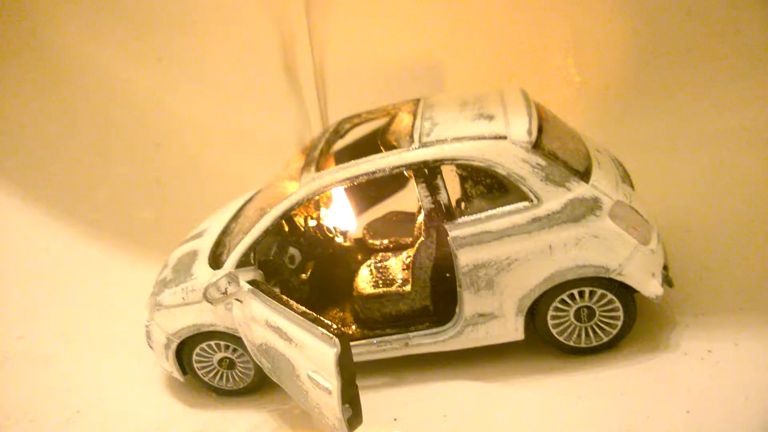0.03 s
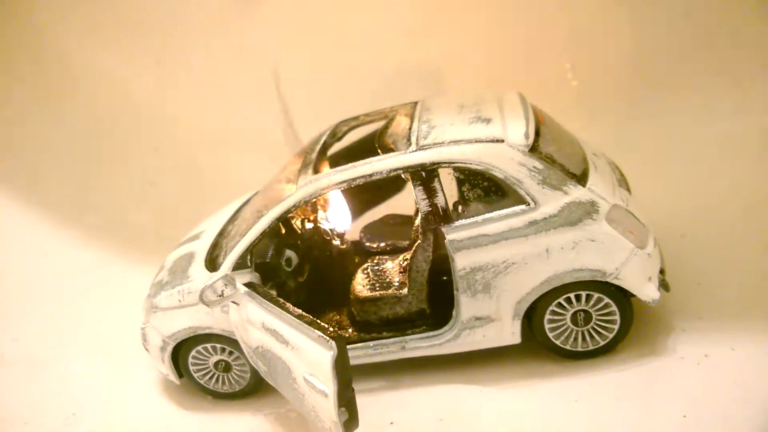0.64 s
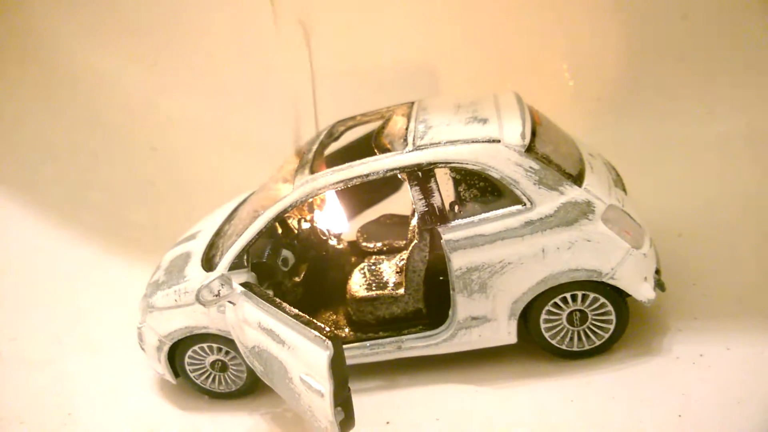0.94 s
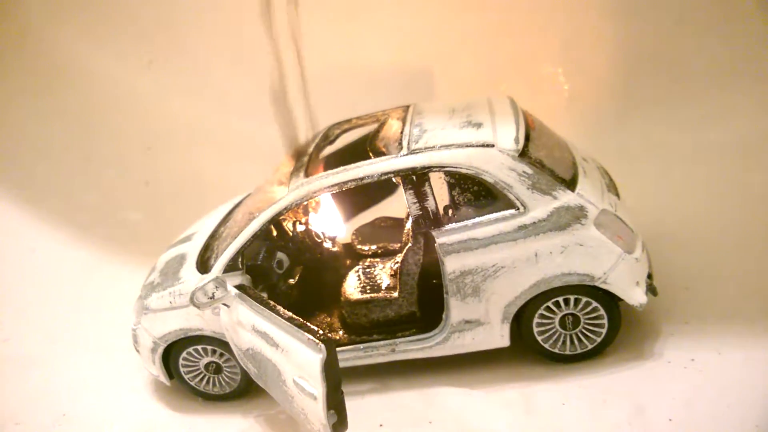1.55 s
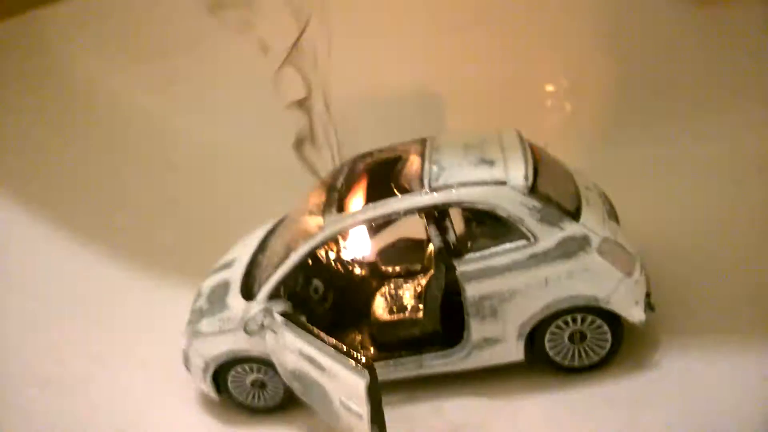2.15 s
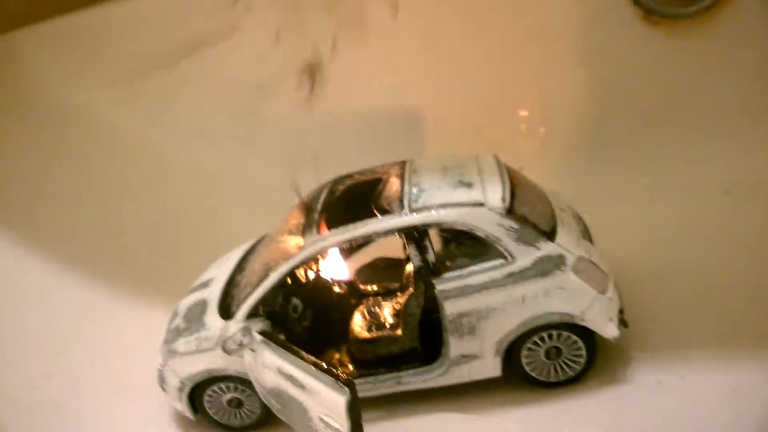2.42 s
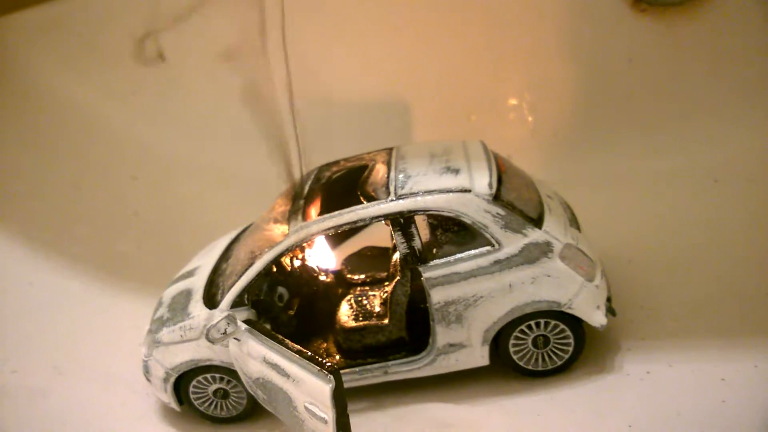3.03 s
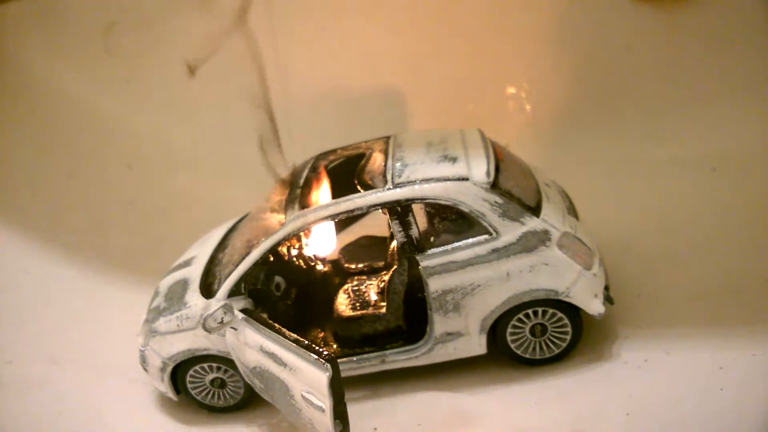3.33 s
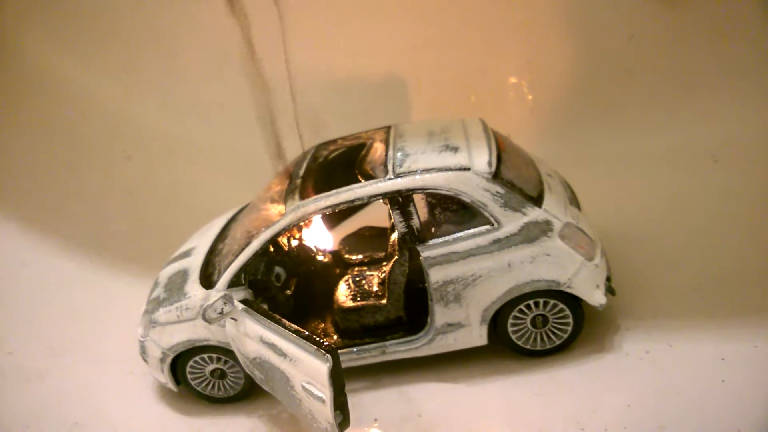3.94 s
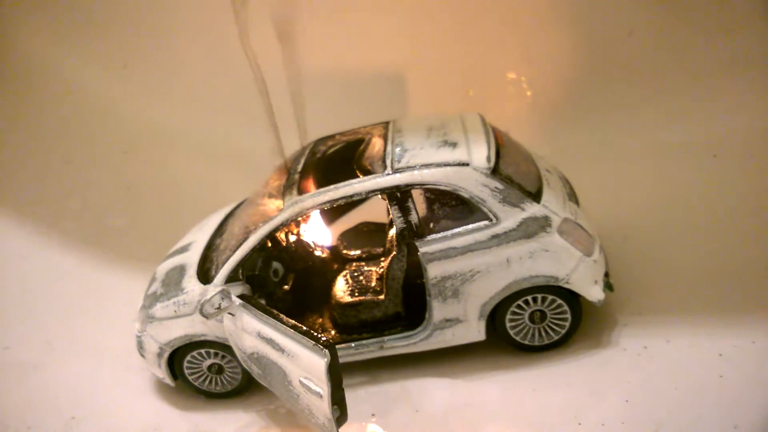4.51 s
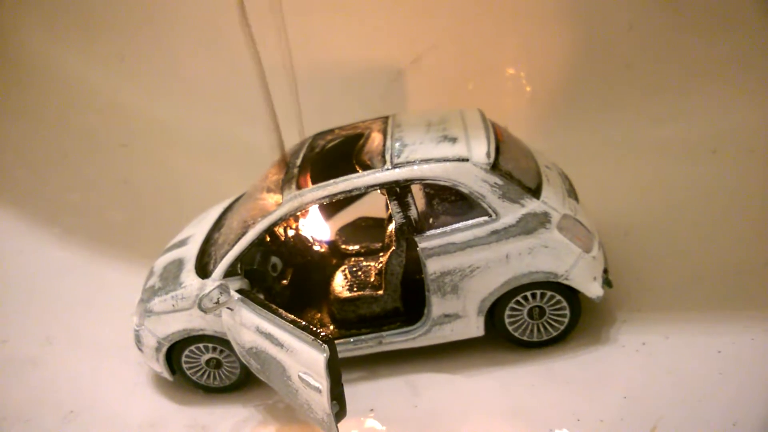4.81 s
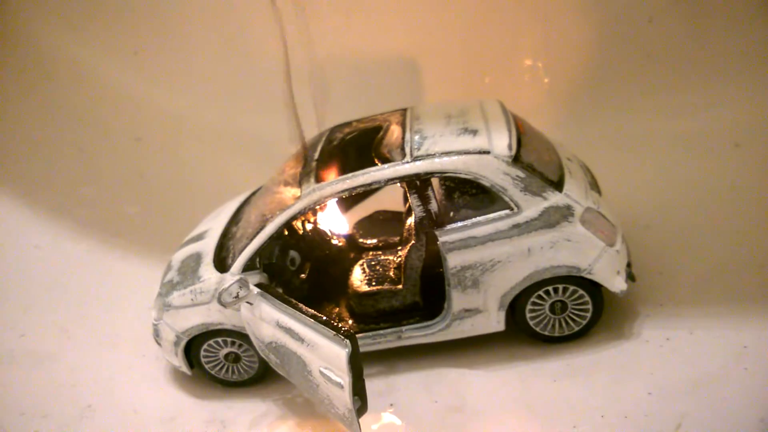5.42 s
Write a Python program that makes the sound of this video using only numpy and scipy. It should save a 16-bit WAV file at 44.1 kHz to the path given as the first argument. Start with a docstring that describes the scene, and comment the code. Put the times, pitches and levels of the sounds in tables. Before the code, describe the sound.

A small flame eats at a plastic toy car in a sink, heard close up in a tiled room. For the whole five and a half seconds, faint, dry ticks and crackles come irregularly, about ten a second, over a quiet steady hiss and a thin sizzle that sometimes spits briefly. At about 0.4 seconds the hand-held microphone is bumped, a light touch and then a dull knock that briefly rings the basin. A second bump comes at 2.2 seconds with a soft low rumble of shifting grip. The loudest sound is a sharp pop at 3.4 seconds, followed at once by a third bump. The crackling carries on, with small fizzes around 4 seconds and another strong pop at 5 seconds. A faint hollow hum swells softly underneath, with a few tiny finger taps. Pops and knocks have a very short echo.

```python
"""Burning toy car in a sink

A small flame eats the plastic seats of a toy car that stands in a sink in a tiled room. Blisters
burst and excite the resonances of the car's shell: most tick, a few pop loudly, over a steady hiss.
A hand-held camera is bumped three times, each a touch and then a knock that rings its case and the
basin. Beneath, the air modes of the basin's hollow hum in soft swells."""
import sys
import numpy as np
from scipy import signal
from scipy.fft import rfft, irfft
from scipy.io import wavfile

SR = 44100
rng = np.random.default_rng(int(sys.argv[2]) if len(sys.argv) > 2 else 0)


def inscribe(sig):
    """Save sig as 16-bit PCM at rate SR to the path in sys.argv[1].

    A 1-D sig is mono; a 2-D sig holds one channel per row.
    Samples are clipped to [-1, 1] before scaling.
    """
    pcm = np.round(np.clip(np.atleast_2d(sig).T, -1, 1) * 32767)
    wavfile.write(sys.argv[1], SR, pcm.astype(np.int16))


N = 245637
TIME = np.arange(N) / SR

# air modes of the basin and the room: (frequency [Hz], bandwidth [Hz], gain [dB])
AIR_MODES = [(189.8, 25, -4.5), (252, 7.4, -6.5), (409, 21.5, -5), (473, 27.5, 1.5), (735, 73, -16)]
# spectrum of the hand's rubbing and rumble: (frequency [Hz], relative density [dB])
HANDLING_SPECTRUM = [(15, -4.5), (30, 6.5), (60, -5), (120, -9), (300, -18), (900, -21), (2500, -58.5)]


def blisters(count=64, faint_per_s=4, faint_db=-44.5, faint_treble_db=-11, spread_db=2):
    """A point process: faint ticks fall at random gaps among the prominent bursts."""
    # bursting blisters: (time [s], relative level [dB], treble share [dB])
    prominent = [(0.1067, -38.5, -15), (0.2313, -42.5, -19), (0.336, -30.5, -23), (0.5492, -33, -18),
                 (0.8702, -28, -30), (0.9518, -45.5, -5), (1.1852, -41, -7), (1.2017, -28, -5),
                 (1.4377, -37.5, -23), (1.5683, -31.5, -10), (1.5848, -37.5, -5), (1.7573, -25, -3),
                 (1.9644, -35, -15.5), (2.001, -33.5, -11), (2.279, -36.5, -28), (2.4145, -25, -27),
                 (2.5999, -39.5, -2.5), (2.7995, -40, -12), (2.8503, -25.5, -9.5), (3.052, -32, -23),
                 (3.0704, -25.5, -21), (3.248, -43, -25), (3.3842, -7, -18.5), (3.5918, -30.5, -18),
                 (3.771, -33.5, -12.5), (3.8114, -35.5, -11), (3.8345, -38, -8), (4.0304, -31.5, -21),
                 (4.2045, -39, -16), (4.2628, -34, -6.5), (4.4212, -38, -4), (4.4398, -37, -5.5),
                 (4.65, -29.5, -30), (4.698, -26, -16.5), (5.0002, -12, -13.5), (5.1517, -34.5, -28),
                 (5.3041, -39.5, -10.5), (5.3642, -41.5, -16), (5.408, -32.5, -22), (5.4608, -27, -20),
                 (5.4896, -30, -34)]
    gap, size, colour = rng.uniform(-1, 1, (count, 3)).T
    times = np.cumsum(1 + gap) / faint_per_s
    faint = np.transpose([times, faint_db + spread_db * size, faint_treble_db + spread_db * colour])
    return np.vstack([prominent, faint[times < N / SR]])


def rupture(tear_s, tear_share, fizzle_s, fizzle_share):
    """Impulsive excitation of unit energy: a blister breaks, its skin tears and gas fizzles out."""
    force = tear_share * burst(tear_s) + fizzle_share * burst(fizzle_s)
    force[0] += 1
    return force / np.linalg.norm(force)


def crackles(gain_db, treble_hz, body_hz, lag_s, open_pop_db):
    """Each rupture is a broadband transient that drives the shell and partly escapes to the room."""
    usual_db, usual_treble_db = -24.5, -18
    on_shell, escaping = np.zeros((2, N))
    for s, db, treble_db in blisters():
        slowness = from_db(2.03 * (open_pop_db - db))   # weak blisters tear more slowly
        tick = rupture(tear_s=0.000093 * slowness, tear_share=0.86 * slowness,
                       fizzle_s=0.0031, fizzle_share=0.29 * slowness)
        # the louder the pop, the thinner its body; no two are alike
        body_db = 0.3679 * (usual_db - db) + 2.5 * rng.uniform(-1, 1)
        treble = (from_db(treble_db - usual_treble_db) - 1) * resonate(tick, [(treble_hz, 6000, 0)])
        body = (from_db(body_db) - 1) * resonate(tick, [(body_hz, 3200, 0)])
        tick = from_db(db + gain_db) * (tick + treble + body)
        add(on_shell, s + lag_s, tick)
        # the loudest burst at the open roof, the rest deep in the cabin
        add(escaping, s + lag_s, tick * from_db(1.5 * min(db - open_pop_db, 0)))
    return on_shell, escaping


def sizzle(simmer_db, spit_db, highpass_hz):
    """Shot noise with little body: the melt simmers throughout and now and then spits a dense fizz."""
    # strength of the simmering melt: (time [s], relative level [dB])
    simmer_curve = [(0, -0.5), (0.7, -8.5), (1.1, -4), (2.4, 1), (3.7, -2), (4.2, -3), (5.57, -0.5)]
    # gas spitting out of the melt: (peak time [s], relative level [dB])
    spits = [(0.115, -58), (0.336, -64), (0.424, -54.5), (0.558, -60), (0.875, -58), (1.433, -56.5),
             (1.679, -57.5), (2.0, -58.5), (2.797, -66), (3.784, -55.5), (4.052, -51.5), (4.455, -59.5),
             (4.679, -56)]
    simmer_gain = from_db(np.interp(TIME, *np.transpose(simmer_curve)) + simmer_db)
    simmer = simmer_gain * grains(per_s=520, spread_db=3.0)
    spit_gain = sum(swell(s, db + spit_db, sigma_s=0.015) for s, db in spits)
    fizz = spit_gain * grains(per_s=2500, spread_db=10.5)
    return cut(simmer + fizz, highpass_hz, "high", order=1)


def grains(per_s, spread_db):
    """A Poisson process of unit rms: tiny blisters burst independently, in random sizes."""
    sizes = from_db(spread_db * np.minimum(rng.exponential(1, N), 3)) * rng.choice([-1, 1], N)
    return rms_one(sizes * (rng.random(N) < per_s / SR))


def car_shell(force):
    """Forced vibration: the car's resonances colour every burst."""
    # modes of the shell and cabin: (frequency [Hz], bandwidth [Hz], gain [dB])
    shell_modes = [(740, 425, -7), (1376, 400, -7.5), (2103, 210, 0.5), (2466, 100, -6.5), (3524, 327, 0),
                   (5044, 456, 1), (6030, 810, 2.5), (7310, 850, -4), (7300, 940, -1), (9650, 334, -2.5),
                   (10350, 400, -3), (11750, 120, -8.5), (13240, 360, -6), (16300, 270, -42)]
    return resonate(force, shell_modes)


def contacts():
    """Multiple impact: a bump is a rebounding touch, two soft pushes of the hand, then a knock."""
    # soft nudges of the palm: (time [s], relative level [dB], contact time [ms])
    nudges = [(0.674, -54, 9.2), (0.6889, -43, 2.7), (1.403, -51, 4), (2.114, -44.5, 4.7),
              (2.122, -38.5, 11), (2.465, -44.5, 27), (4.857, -43.5, 33)]
    # bumps of the hand on the camera, in relative levels:
    # (knock time [s], knock [dB], touch [dB], weight [dB], weight's lead [s], share to the basin [dB])
    hand_bumps = [(0.4233, -24, -38, -35.5, 0.0178, -0.5), (2.2168, -31, -36.5, -25, 0.00345, -4.5),
                  (3.4053, -31.5, -37.5, -27.5, 0.0169, -6)]
    touch_lead_s, rebound_s, grip_lead_s = 0.037, 0.006, 0.009
    touch_ms, rebound_ms, weight_ms, grip_ms, knock_ms = 1.0, 2.8, 5.3, 3.77, 1.17
    rows = [(s, db, contact_ms, 0) for s, db, contact_ms in nudges]
    for s, knock_db, touch_db, weight_db, weight_lead_s, passed_db in hand_bumps:
        rows += [(s - touch_lead_s, touch_db, touch_ms, passed_db),
                 (s - touch_lead_s + rebound_s, touch_db, rebound_ms, passed_db),
                 (s - weight_lead_s, weight_db, weight_ms, passed_db),
                 (s - grip_lead_s, weight_db - 4, grip_ms, passed_db),
                 (s, knock_db, knock_ms, passed_db)]
    return rows


def bumps(push_db, case_db, basin_db, rub_db, rub_s):
    """Impact excitation: the shorter the hand's contact, the higher the modes that it reaches."""
    # modes of the camera's case: (frequency [Hz], gain [dB], T60 [s])
    case_modes = [(137, -21, 0.07), (253, -7.5, 0.057), (497, -3.5, 0.11), (710, -1.5, 0.015),
                  (930, -43, 0.0084), (1430, -15, 0.047)]
    # modes of the basin, whose close pairs beat: (frequency [Hz], gain [dB], T60 [s])
    basin_modes = [(179, -22.5, .35), (189, -17.5, .4), (243, -27, .4), (307, -35, .35), (446, -24, .3),
                   (466, -19.5, .37), (690, -39, .4)]
    push, on_case, on_basin, rub = np.zeros((4, N))
    for s, db, contact_ms, passed_db in contacts():
        phase = np.minimum(TIME[:2048] * 1000 / contact_ms, 1)
        pulse = np.sin(np.pi * phase) ** 2
        add(push, s, from_db(db) * pulse)
        add(on_case, s, from_db(db) * pulse / pulse.sum())
        add(on_basin, s, from_db(db + passed_db) * pulse / pulse.sum())
        add(rub, s, from_db(db) * np.exp(-TIME[:SR // 4] / rub_s))
    case = sum(from_db(db + case_db) * ring(on_case, hz, t60) for hz, db, t60 in case_modes)
    basin = sum(from_db(db + basin_db) * ring(on_basin, hz, t60) for hz, db, t60 in basin_modes)
    # the skin drags a little after each touch
    drag = cut(from_db(rub_db) * rub * coloured_noise(HANDLING_SPECTRUM, N), 1500, "low")
    return drag - cut(from_db(push_db) * push + case + basin, 14, "high", order=1)


def taps(rise_cycles):
    """Heavy damping: under a fingertip the case swings for only a cycle or two."""
    # light taps on the camera's case: (time [s], envelope peak [dB], frequency [Hz])
    finger_taps = [(1.312, -56.5, 617), (1.412, -50, 600), (2.334, -51.5, 656), (2.391, -49.5, 606),
                   (3.14, -51.5, 332), (4.362, -50.5, 480), (4.854, -44.5, 626)]
    out, t = np.zeros(N), TIME[:2048]
    for s, db, hz in finger_taps:
        age = t * hz / rise_cycles
        envelope = from_db(db) * age ** 2 * np.exp(2 * (1 - age))
        add(out, s, envelope * np.sin(2 * np.pi * hz * t))
    return out


def basin_walls(x, share, decay_s, nearest_s):
    """Early reflection: the curved glaze adds a spray of echoes within milliseconds."""
    echoes = share * burst(decay_s) * (TIME[:1024] > nearest_s)
    return x + signal.fftconvolve(x, echoes)[:N]


def room(x, wet_db, t60, treble_t60, treble_hz, first_echo_s):
    """Reverberation: tiled walls return a short, dense tail after a gap; its treble dies first."""
    # spectrum of the reverberation: (frequency [Hz], relative density [dB])
    tail_spectrum = [(100, -9), (500, -4), (1500, -6.5), (2900, -11), (3700, 1), (5200, -2), (7500, -5),
                     (10500, -3.5), (12500, -11), (15500, -20)]
    t = TIME[:SR // 2]
    noise = coloured_noise(tail_spectrum, len(t))
    low = cut(noise, treble_hz, "low", order=1)
    tail = low * from_db(-60 * t / t60) + (noise - low) * from_db(-60 * t / treble_t60)
    tail *= t > first_echo_s
    return from_db(wet_db) * signal.fftconvolve(x, tail / np.linalg.norm(tail))[:N]


def boom(x, gain_db, t60):
    """Modal decay: a bump stirs the room's air modes, which beat unevenly as they die."""
    tail = resonate(rng.standard_normal(SR), AIR_MODES) * from_db(-60 * TIME[:SR] / t60)
    return from_db(gain_db) * signal.fftconvolve(x, tail / np.linalg.norm(tail))[:N]


def hiss(level_db):
    """Stationary broadband noise: a steady hiss under the flame."""
    # spectrum of the hiss: (frequency [Hz], relative density [dB])
    hiss_spectrum = [(59, -65), (100, -10.5), (185, -5), (358, -7), (452, 1), (502, -11.5), (818, -16.5),
                     (970, -13.5), (1760, -18.5), (1910, -15.5), (2990, -19.5), (5190, -17.5),
                     (6990, -21.5), (10500, -23), (16000, -26.5)]
    return from_db(level_db) * coloured_noise(hiss_spectrum, N)


def handling_rumble(steady_db, regrip_s, regrip_db):
    """Structure-borne noise: small movements rumble in the camera, more as the hand shifts its grip."""
    envelope = from_db(steady_db) + swell(regrip_s, regrip_db, sigma_s=0.26)
    return envelope * coloured_noise(HANDLING_SPECTRUM, N)


def basin_hum(steady_db, swell_gain_db):
    """Cavity resonance: noise drives the basin's air modes, which hum and swell softly."""
    # swells of the hum: (peak time [s], relative level [dB], Gaussian width [s])
    hum_swells = [(0.168, -75.5, 0.039), (0.55, -61.5, 0.035), (0.681, -58.5, 0.0094), (1.798, -64, 0.033),
                  (1.986, -58.5, 0.079), (2.42, -62.5, 0.071), (3.02, -64.5, 0.057), (3.547, -57, 0.02),
                  (4.476, -63, 0.047), (4.632, -60.5, 0.035), (5.178, -57.5, 0.016), (5.293, -59, 0.044),
                  (5.56, -66, 0.088)]
    swelling = sum(swell(s, db + swell_gain_db, sigma_s) for s, db, sigma_s in hum_swells)
    return (from_db(steady_db) + swelling) * rms_one(resonate(rng.standard_normal(N), AIR_MODES))


def resonate(x, resonances):
    """Modal superposition: parallel band-pass resonators of alternating sign."""
    out = 0
    for k, (hz, width, db) in enumerate(resonances):
        r = np.exp(-np.pi * width / SR)
        poles = [1, -2 * r * np.cos(2 * np.pi * hz / SR), r * r]
        band = (1 - r * r) / 2 * signal.lfilter([1, 0, -1], poles, x + 1e-18)
        out = out + (-1) ** k * from_db(db) * band
    return out


def ring(x, hz, t60):
    """A damped oscillator: a unit impulse starts a decaying sine of amplitude one."""
    r, w = from_db(-60 / (t60 * SR)), 2 * np.pi * hz / SR
    return signal.lfilter([0, np.sin(w)], [1, -2 * r * np.cos(w), r * r], x + 1e-18)


def burst(decay_s, size=1024):
    """Exponential decay: a puff of noise with unit energy."""
    puff = rng.standard_normal(size) * np.exp(-TIME[:size] / decay_s)
    return puff / np.linalg.norm(puff)


def swell(s, db, sigma_s):
    """A Gaussian envelope: gain rises and falls around a time."""
    return from_db(db) * np.exp(-((TIME - s) / sigma_s) ** 2 / 2)


def coloured_noise(spectrum, size):
    """Spectral shaping of white noise, scaled to unit rms."""
    hz, db = np.transpose(spectrum)
    bins = np.maximum(np.fft.rfftfreq(size, 1 / SR), 1)
    gain = from_db(np.interp(np.log(bins), np.log(hz), db))
    return rms_one(irfft(rfft(rng.standard_normal(size)) * gain, size))


def cut(x, hz, kind, order=2):
    """Maximally flat low- or high-pass filtering."""
    return signal.sosfilt(signal.butter(order, min(hz, .45 * SR), kind, fs=SR, output="sos"), x)


def add(track, s, sound):
    """Superposition of a short sound on a track at a given time."""
    at = int(np.clip(round(s * SR), 0, N - 1))
    track[at:at + len(sound)] += sound[:N - at]


def rms_one(x):
    """Normalisation to unit rms."""
    return x / np.sqrt(np.mean(x ** 2) + 1e-20)


def from_db(db):
    """Decibels to amplitude ratio."""
    return 10 ** (np.asarray(db) / 20)


def scene():
    """Source and path: fire and knocks sound with the room's echo, over hiss, rumble and hum."""
    on_shell, escaping = crackles(gain_db=9, treble_hz=11440, body_hz=1480, lag_s=0.00054,
                                  open_pop_db=-23.5)
    on_shell += sizzle(simmer_db=-60.0, spit_db=6.5, highpass_hz=6000)
    fire = basin_walls(car_shell(on_shell), share=0.53, decay_s=0.0059, nearest_s=0.00055)
    knocks = bumps(push_db=-1.0, case_db=-2, basin_db=5.5, rub_db=-13.5, rub_s=0.011)
    knocks += taps(rise_cycles=0.93)
    echo = room(escaping + knocks, wet_db=-17.0, t60=0.27, treble_t60=0.14, treble_hz=11000,
                first_echo_s=0.015)
    echo += boom(knocks, gain_db=-26.5, t60=0.33)
    background = hiss(level_db=-65)
    background += handling_rumble(steady_db=-67.5, regrip_s=2.21, regrip_db=-59.5)
    background += basin_hum(steady_db=-71.1, swell_gain_db=1.9)
    return (fire + knocks + echo + background)[None]


def record(dry):
    """Gating and band limiting: the sound fades in just after the start and loses its highest treble."""
    start_s, fade_s, cutoff_hz = 0.0723, 0.017, 16000
    fade_in = np.clip((TIME - start_s) / fade_s, 0, 1)
    return signal.sosfilt(signal.ellip(10, .1, 70, cutoff_hz, fs=SR, output="sos"), dry * fade_in)


dry = scene()
out = record(dry)
inscribe(out)
```